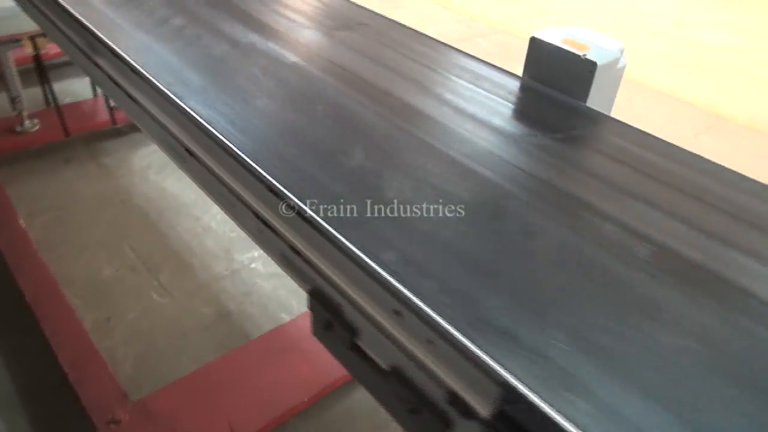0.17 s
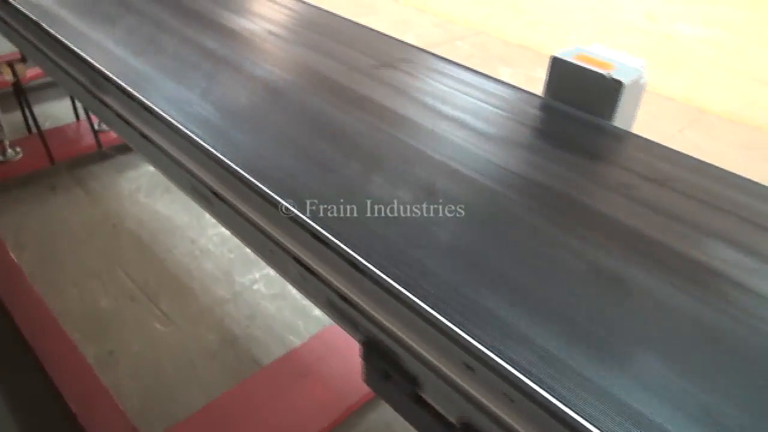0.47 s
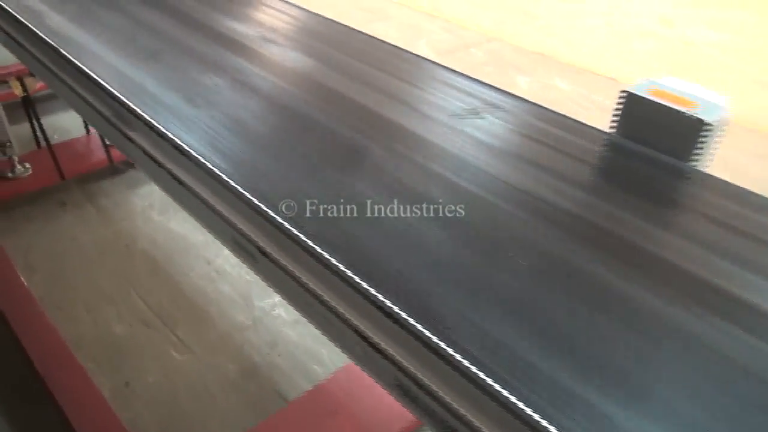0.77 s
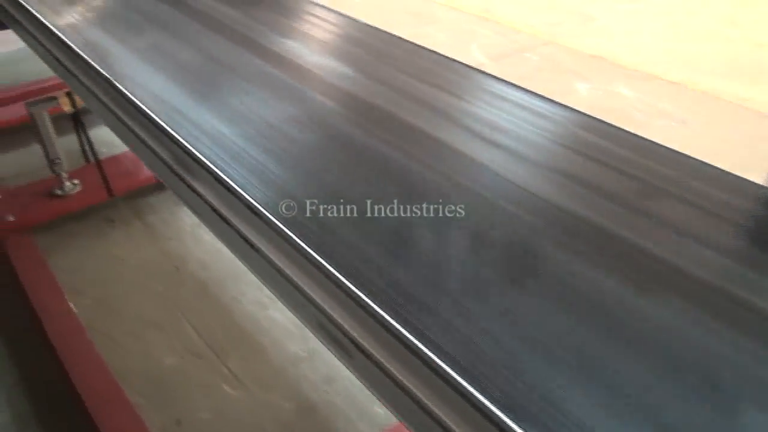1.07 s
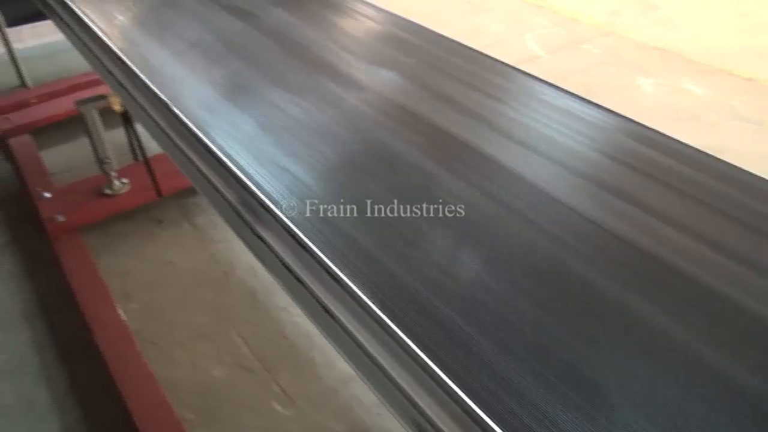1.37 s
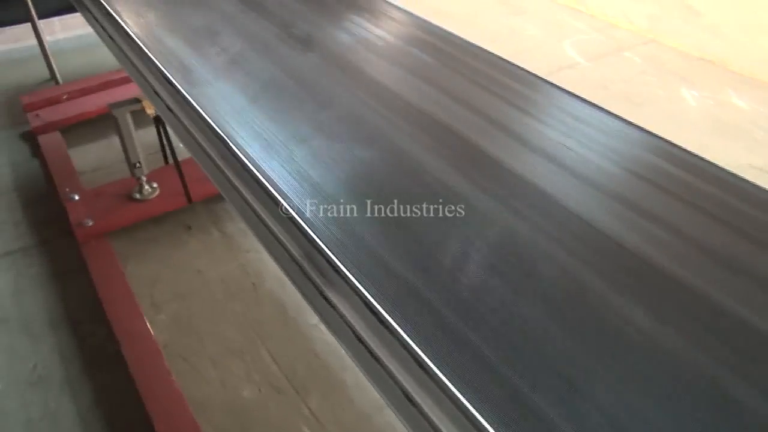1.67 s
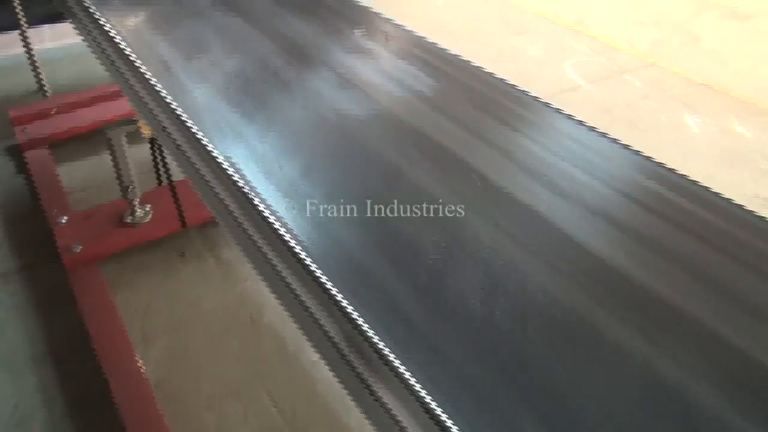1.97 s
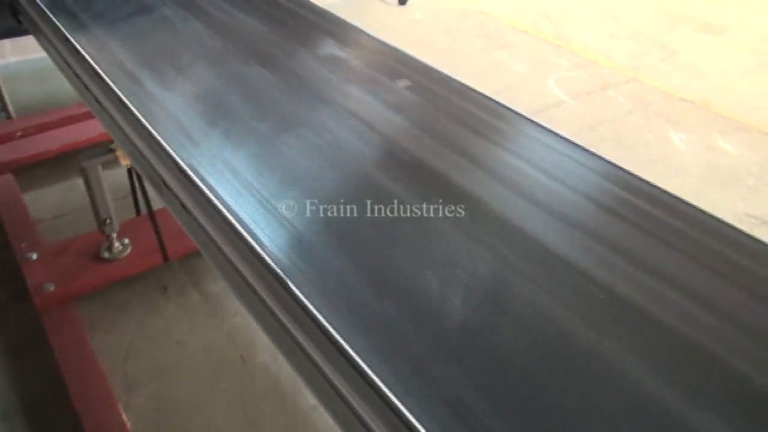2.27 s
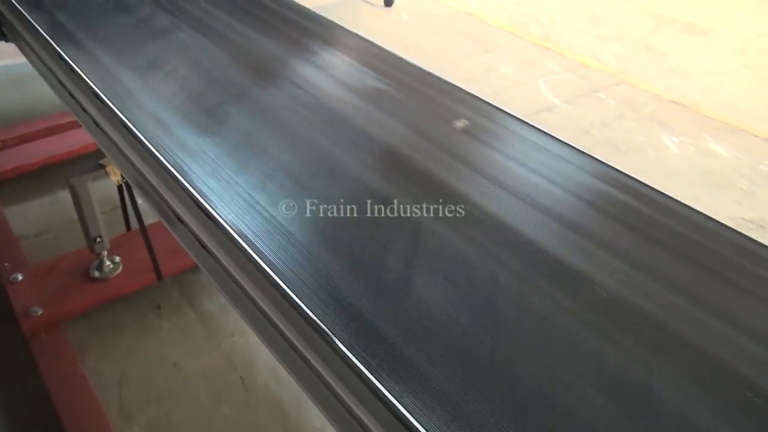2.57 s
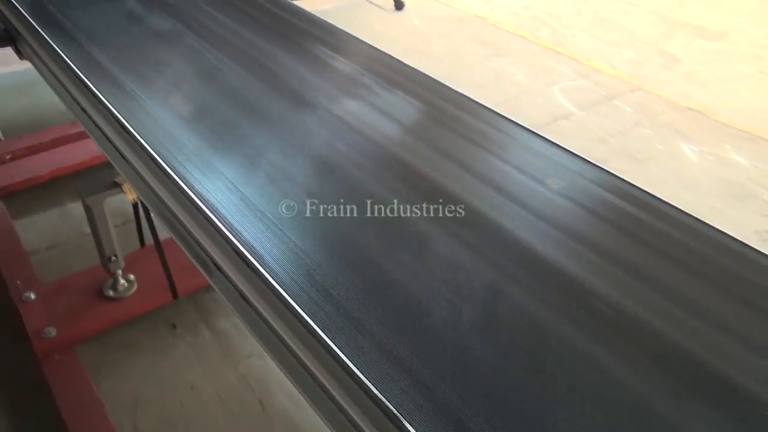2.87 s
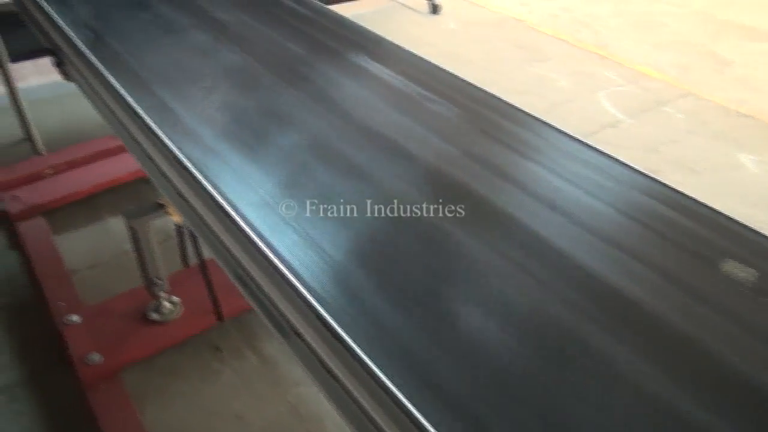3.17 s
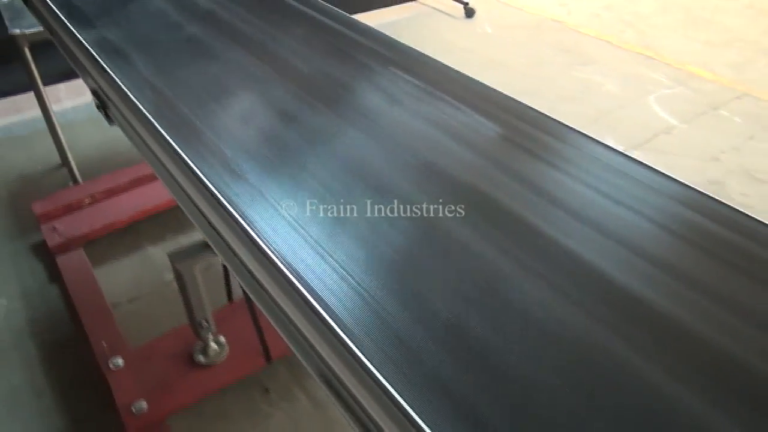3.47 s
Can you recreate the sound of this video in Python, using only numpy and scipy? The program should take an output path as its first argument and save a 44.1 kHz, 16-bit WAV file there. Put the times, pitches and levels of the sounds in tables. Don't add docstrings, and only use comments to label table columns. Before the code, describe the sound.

Steady low belt rumble and motor drone, heard close by; an early half-second hollow scrape from a passing box, brief low groans around one and two seconds, then faint knocks and scuffs as the hum weakens.

```python
import sys
import numpy as np
from scipy import signal
from scipy.fft import rfft, irfft, dct, next_fast_len
from scipy.io import wavfile
from scipy.ndimage import uniform_filter1d, map_coordinates

SR = 44100
rng = np.random.default_rng(int(sys.argv[2]) if len(sys.argv) > 2 else 0)


def boost(x):
    u = np.asarray(x, float) / 20
    return 10 ** u


def inscribe(sig):
    pcm = np.round(np.clip(np.atleast_2d(sig).T, -1, 1) * 32767)
    wavfile.write(sys.argv[1], SR, pcm.astype(np.int16))


N = 159642
TIME = np.arange(N) / SR

# frequency in Hz, level in dB.
MAINS = [(59.5, -44.5), (119.5, -42.5)]
# frequency in Hz, density in dB per Hz.
RUMBLE_SPECTRUM = [(15, -32.5), (25, -7.5), (54, -2.5), (82, 4.5), (98, -5.5), (130, -42), (220, -120)]
# frequency in Hz, density in dB per Hz.
FINE_HISS_SPECTRUM = [(1800, -20.5), (2800, -1.5), (4000, -0.5), (5200, -5.5), (6500, -25.5)]
# time in seconds, level in dB.
DRIVE_LEVEL = [(0, -31), (.5, -29.5), (1, -29), (1.6, -30), (2.4, -31), (2.7, -36), (2.85, -35),
               (3.05, -35.5), (3.2, -45), (3.62, -38)]
# multiple of the note, level in dB.
DRIVE_HARMONICS = [(1, 0), (2, -11), (3, -11)]
# time in seconds, level in dB.
BELT_LEVEL = [(0, -22), (.3, -21.5), (.5, -23), (.77, -23), (1.62, -24), (2.18, -24.5), (2.54, -24.5),
              (2.8, -25), (2.93, -25), (3.05, -24), (3.62, -24)]
# frequency in Hz, density in dB per Hz.
BELT_SPECTRUM = [(70, -30.5), (100, -8.5), (160, -1.5), (280, -5.5), (627, -6.5), (1910, -17),
                 (6440, -38.5), (9700, -58)]
# centre in seconds, length in seconds, level in dB.
SCUFFS = [
    (1.048, 0.036, -30.5),
    (2.858, 0.08, -31.5),
    (2.94, .03, -33),
]
# frequency in Hz, density in dB per Hz.
SCUFF_SPECTRUM = [(100, -11), (200, 5.5), (700, -2), (3000, -16), (6000, -27), (9700, -42.5)]
# time in seconds, pitch in Hz, level in dB.
GROANS = [
    [(0.54, 194.7, -35), (0.584, 187.4, -21.5), (0.662, 192.5, -30), (0.696, 184.6, -27.5),
     (0.74, 162, -27), (0.798, 151.7, -26.5), (0.91, 151, -25)],
    [(0.9, 174.7, -27), (0.976, 181, -22), (1.028, 190, -33), (1.06, 200, -25), (1.08, 169.6, -31),
     (1.094, 160, -21), (1.15, 156.3, -40)],
    [(1.94, 179.0, -31.5), (2.012, 182.4, -24.5), (2.072, 202, -22), (2.116, 176.2, -32),
     (2.12, 176.6, -43)],
]
# centre in seconds, length in seconds, frequency in Hz, level in dB.
BOOMS = [(1.23, 0.076, 321, -30), (2.744, .025, 443, -37.5), (2.807, .04, 129.5, -31),
         (3.502, 0.04, 125, -32), (1.206, 0.077, 225, -33), (2.885, 0.034, 650, -33.5),
         (2.981, 0.019, 685, -31), (3.016, 0.036, 430, -33), (3.026, .025, 284, -33.5),
         (2.53, .025, 175, -30.5), (2.27, 0.0097, 185, -27.5), (2.428, 0.036, 191.3, -29),
         (2.573, 0.03, 120, -29), (2.74, 0.018, 204, -24), (2.82, 0.022, 146, -27.5),
         (2.858, 0.06, 348, -36), (2.922, 0.022, 154.9, -25.5), (2.938, 0.027, 232, -27),
         (3.075, 0.035, 180, -31), (3.252, 0.026, 159, -38), (3.38, 0.035, 145.6, -30),
         (3.398, 0.061, 360.8, -34), (3.555, 0.1, 298, -34.5)]
# time in seconds, level in dB.
CARTON_LEVEL = [(0, -33), (.1, -24), (.2, -19.5), (.28, -20.5), (.42, -21), (.55, -25.5), (.75, -32.5),
                (1, -47.5)]
# frequency in Hz, density in dB per Hz.
SCRAPE_SPECTRUM = [(100, -25), (197, 4.5), (481, -4), (1180, -1), (1600, -14.5), (3500, -16), (6000, -44),
                   (9700, -59.5)]
# frequency in Hz, density in dB per Hz.
EDGE_SPECTRUM = [(1500, -15.5), (2500, -13), (4000, -2), (6000, -11), (9700, -34.5)]
# frequency in Hz, pitch waver as a share, level in dB, peak in seconds, length in seconds.
BED_MODES = [(197, 0.0061, -24.5, 0.19, 0.076), (268, 0.024, -43, 0.34, 0.025),
             (366.2, 0.0033, -26, 0.26, 0.079), (592, .01, -30, 0.2, 0.031), (548, 0.017, -32, 0.17, 0.11),
             (700, 0.008, -29, 0.35, 0.17), (789, 0.0062, -32, 0.29, 0.057),
             (1110, 0.013, -29.5, 0.042, 0.064), (1181, 0.0089, -27, 0.2, 0.065),
             (1230, 0.0064, -28, 0.26, 0.03), (1426, 0.017, -35, 0.29, 0.068),
             (2010, 0.0082, -39.5, 0.26, 0.17), (2130, .006, -38.5, 0.32, 0.12),
             (650, 0.0087, -30, .28, 0.038)]
# frequency in Hz, level in dB.
SIDE_LEVEL = [(1000, -31.5), (1500, -23), (2200, -20), (3000, -22.5), (4300, -16), (6500, -10.5),
              (9000, -8.5)]
# frequency in Hz, share of time it is kept.
SIDE_PRESENCE = [(1000, 0), (1200, .02), (1550, .1), (1900, .25), (2250, .3), (2600, .04), (3300, .14),
                 (3800, .7), (4500, .82), (5150, .15), (5900, .52), (6500, .45), (7200, .18), (8000, .14)]
# time in seconds, shift of the threshold in dB.
THRESHOLD_SHIFTS = [(.02, 4), (.19, -5), (.24, 4), (.32, -5), (.44, 4), (.63, 4), (.72, -4), (.8, 9),
                    (.86, -3), (.92, 8), (1.01, -9), (1.18, -5), (1.25, 7), (1.3, -5), (1.38, 6),
                    (1.46, -4), (1.67, -4), (1.75, 7), (1.8, -5), (1.89, 5), (2, 8), (2.12, -5), (2.21, -5),
                    (2.52, 8), (2.64, -5), (2.87, -8), (2.92, 5), (3.05, -4), (3.41, -4), (3.53, -4)]

FRAME, GRID = 1024, 496
WINDOW = signal.windows.kaiser_bessel_derived(2 * FRAME, 4 * np.pi)


def unit(x):
    return x / np.sqrt(np.mean(x ** 2) + 1e-20)


def along(points, hz):
    f, v = np.transpose(points)
    return np.interp(np.log(hz + 1), np.log(f + 1), v)


def curve(rows):
    return np.interp(TIME, *np.transpose(rows))


def drift(db_per_s):
    return db_per_s * (TIME - N / 2 / SR)


def wobble(rate):
    return map_coordinates(rng.standard_normal(400), [TIME * min(rate, 100)])


def filtered(x, response):
    m = next_fast_len(N + SR // 2)
    return irfft(rfft(x, m) * response(np.fft.rfftfreq(m, 1 / SR)), m)[..., :N]


def rush(spectrum, patchy_db):
    z = signal.stft(rng.standard_normal(N + 512), nperseg=512)[2]
    field = uniform_filter1d(rng.standard_normal(z.shape), size=6, axis=0)
    field = uniform_filter1d(field, size=14, axis=1)
    x = signal.istft(z * boost(patchy_db * unit(field)), nperseg=512)[1][:N]
    return unit(filtered(x, lambda hz: boost(along(spectrum, hz))))


def tone(hz, waver, rate):
    cycles = np.cumsum(hz * (1 + waver * wobble(rate))) / SR
    return np.sqrt(2) * np.sin(2 * np.pi * cycles + 6 * rng.random())


def bump(s, length):
    return np.exp(-.5 * ((TIME - s) / length) ** 2)


def mains():
    buzz = sum(boost(db + 3.5 * wobble(3.3)) * tone(hz, 0.0047, 5.4) for hz, db in MAINS)
    return boost(drift(0.5)) * buzz


def floor():
    return boost(-39.5 + drift(1.5)) * rush(RUMBLE_SPECTRUM, patchy_db=0.0)


def fine_hiss():
    return boost(-48.5 + drift(0.5) + 1.2 * wobble(8)) * rush(FINE_HISS_SPECTRUM, patchy_db=2.0)


def groan(rows):
    s, hz, db = np.transpose(rows)
    fade_s = 0.022
    fade = np.clip(np.minimum(TIME - s[0], s[-1] - TIME) / fade_s, 0, 1)
    return fade * boost(np.interp(TIME, s, db)) * tone(np.interp(TIME, s, hz), 0.006, 32)


def frame():
    groans = sum(map(groan, GROANS))
    booms = sum(boost(db) * bump(s, length) * tone(hz, 0.013, 11) for s, length, hz, db in BOOMS)
    return groans + booms


def drive():
    note_hz = 72.24
    hum = sum(boost(db + 0.15 * wobble(6.5)) * tone(k * note_hz, 0.0021, 3) for k, db in DRIVE_HARMONICS)
    return boost(curve(DRIVE_LEVEL)) * hum


def scuffs():
    swells = sum(boost(db) * bump(s, length) for s, length, db in SCUFFS)
    return swells * rush(SCUFF_SPECTRUM, patchy_db=.5)


def belt():
    level_db = curve(BELT_LEVEL) + 0.51 * wobble(4.0) + 0.19 * wobble(11.41)
    return boost(level_db) * rush(BELT_SPECTRUM, patchy_db=0.35)


def edge_hiss():
    peak_s, length_s, peak_db = 0.2, 0.041, -30.5
    late = (TIME - peak_s) / length_s
    fall_db = 5.5 * np.where(late > 0, 0.76, 1)
    return boost(peak_db - fall_db * (np.sqrt(1 + late ** 2) - 1)) * rush(EDGE_SPECTRUM, patchy_db=.5)


def carton():
    ring = sum(boost(db + 1.4 * wobble(30.1)) * bump(s, length) * tone(hz, waver, 39.2)
               for hz, waver, db, s, length in BED_MODES)
    hiss = edge_hiss()
    scrape = boost(curve(CARTON_LEVEL)) * rush(SCRAPE_SPECTRUM, patchy_db=.5)
    return scrape + ring + hiss


def scene():
    rubbing = belt() + floor() + carton()
    mid = drive() + mains() + rubbing + frame() + scuffs() + fine_hiss()
    side = filtered(np.roll(rubbing, 1500), lambda hz: boost(along(SIDE_LEVEL, hz)))
    return np.array([mid + side, mid - side])


def lapped_spectrum(x):
    x = np.pad(x, (2 * FRAME - GRID, 3 * FRAME))
    frames = np.lib.stride_tricks.sliding_window_view(x, 2 * FRAME)[::FRAME] * WINDOW
    a, b, c, d = np.split(frames, 4, axis=1)
    return dct(np.hstack([-c[:, ::-1] - d, a - b[:, ::-1]]), type=4, norm="ortho")


def overlap_add(z):
    u, v = np.split(dct(z, type=4, norm="ortho"), 2, axis=1)
    head, tail = np.split(np.hstack([v, -v[:, ::-1], -u[:, ::-1], -u]) * WINDOW, 2, axis=1)
    return (head[1:] + tail[:-1]).ravel()[FRAME - GRID:][:N]


def band_rms(z, size):
    return np.repeat(np.sqrt(np.mean(z.reshape(len(z), -1, size) ** 2, axis=2) + 1e-20), size, axis=1)


def threshold(mid):
    count, band_bins, memory = len(mid), 32, 24
    level = band_rms(mid, size=FRAME)[:, 0]
    level_db = 20 * np.log10(level + 1e-6)
    usual_db = np.median(level_db)
    recent_db = uniform_filter1d(level_db, size=memory, origin=memory // 2 - 1, mode="constant", cval=usual_db)
    t = (np.arange(count) * FRAME + GRID - FRAME) / SR
    shift_db = sum(db * np.exp(-.5 * ((t - s) / .016) ** 2) for s, db in THRESHOLD_SHIFTS)
    swing_db = 1.2 * rng.standard_normal(count) + shift_db + .9 * (recent_db - usual_db)
    band_db = np.repeat(rng.standard_normal((count, FRAME // band_bins)), band_bins, axis=1)
    return (level * boost(-31 + swing_db))[:, None] * boost(band_db)


def thin(pair):
    mid, side = lapped_spectrum((pair[0] + pair[1]) / 2), lapped_spectrum((pair[0] - pair[1]) / 2)
    count, hz = len(mid), np.arange(FRAME) * SR / 2 / FRAME
    limit = threshold(mid)
    gap_bins = 8
    field = uniform_filter1d(rng.standard_normal((count, FRAME // gap_bins)), size=3, axis=0)
    gap_db = np.repeat(-2 + 4 * unit(field), gap_bins, axis=1)
    solid = band_rms(mid, size=gap_bins) > limit * boost(gap_db)
    kept = (band_rms(mid, size=32) > limit) & solid | (hz < 4500)
    luck = uniform_filter1d(rng.standard_normal((count, FRAME // 16)), size=2, axis=0)
    luck = uniform_filter1d(luck, size=2, axis=1)
    rank = luck.argsort(axis=0).argsort(axis=0) / count
    side_kept = kept & np.repeat(rank < along(SIDE_PRESENCE, hz[8::16]), 16, axis=1)
    step, side_step = boost(1) * limit, boost(2) * band_rms(side, size=16)
    mid = overlap_add(np.round(mid / step) * step * kept)
    side = overlap_add(np.round(side / side_step) * side_step * side_kept)
    return np.array([mid + side, mid - side])


def band_limit(x):
    return signal.sosfilt(signal.butter(12, 9610, fs=SR, output="sos"), x)


def record(dry):
    mix = thin(dry)
    return band_limit(mix)


dry = scene()
out = record(dry)
inscribe(out)
```